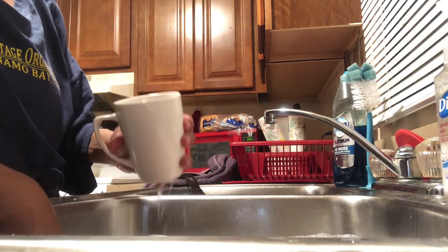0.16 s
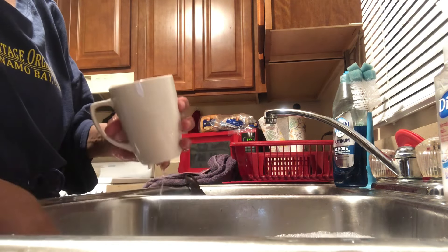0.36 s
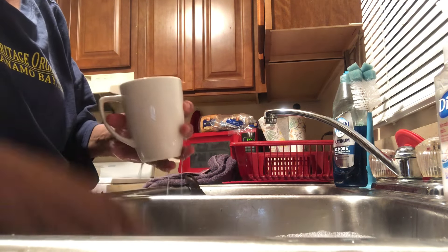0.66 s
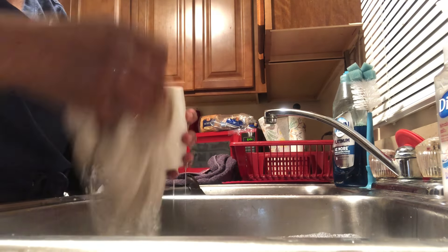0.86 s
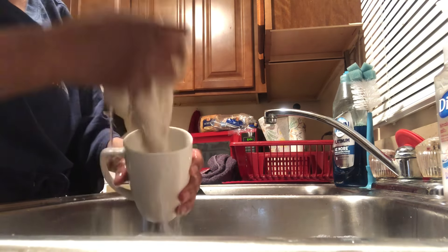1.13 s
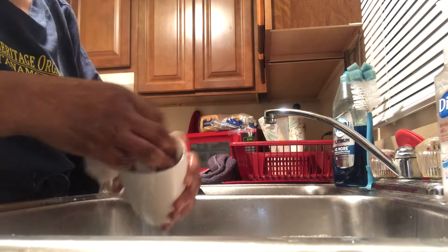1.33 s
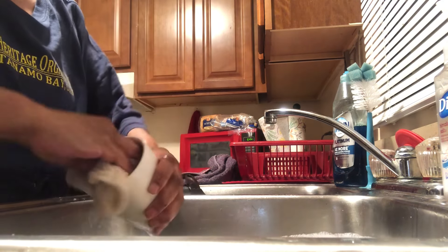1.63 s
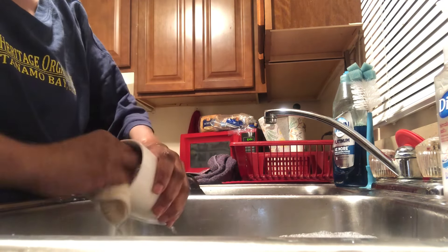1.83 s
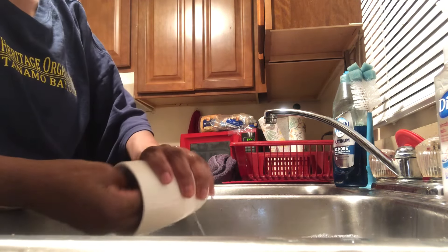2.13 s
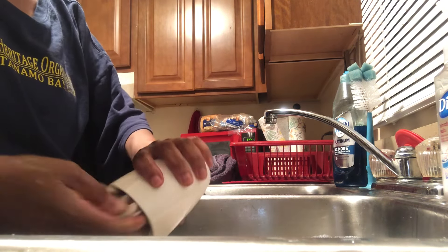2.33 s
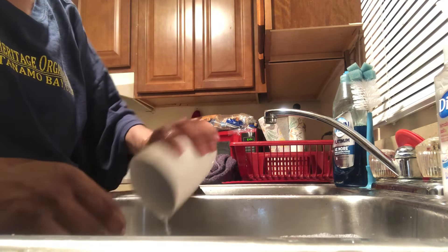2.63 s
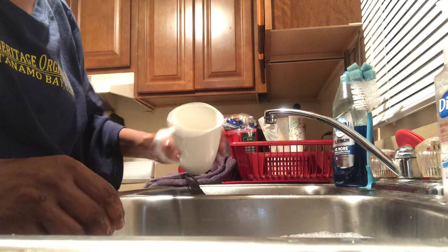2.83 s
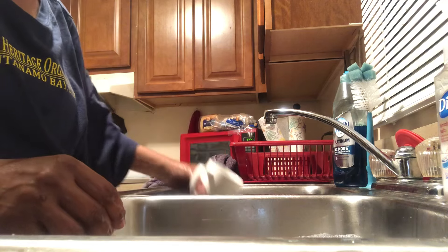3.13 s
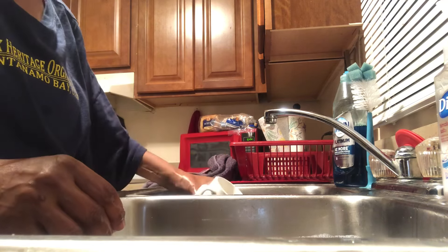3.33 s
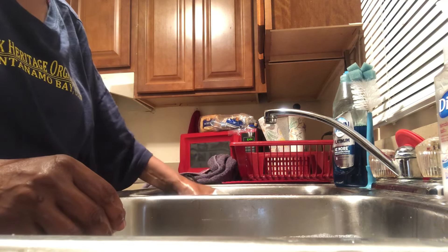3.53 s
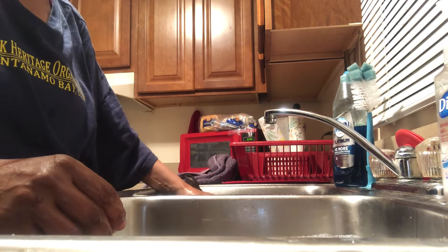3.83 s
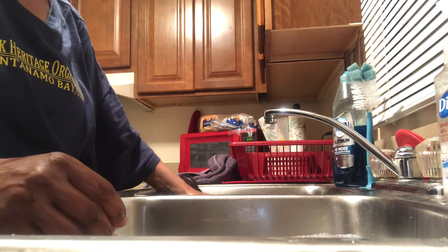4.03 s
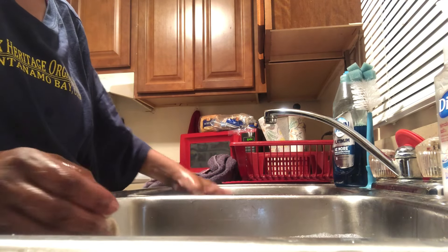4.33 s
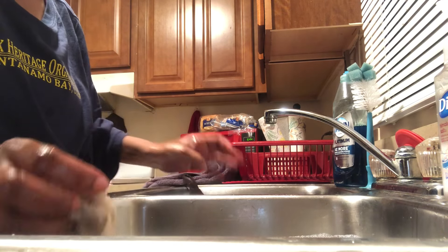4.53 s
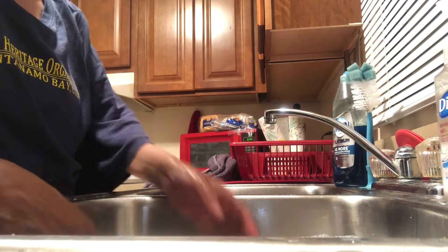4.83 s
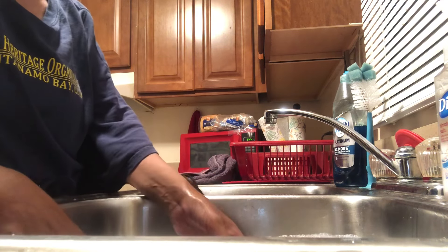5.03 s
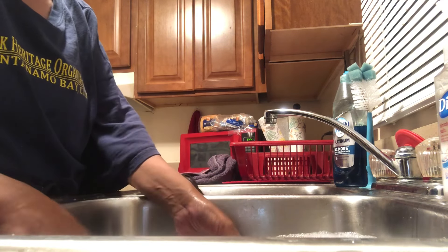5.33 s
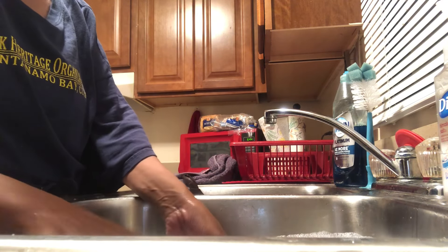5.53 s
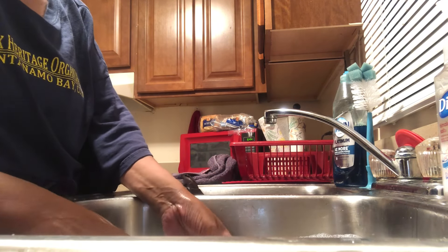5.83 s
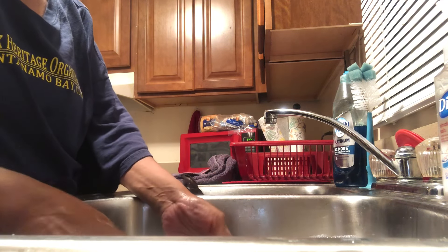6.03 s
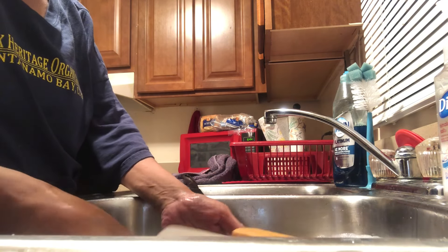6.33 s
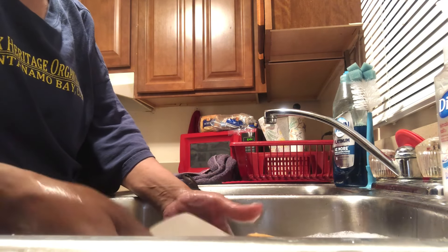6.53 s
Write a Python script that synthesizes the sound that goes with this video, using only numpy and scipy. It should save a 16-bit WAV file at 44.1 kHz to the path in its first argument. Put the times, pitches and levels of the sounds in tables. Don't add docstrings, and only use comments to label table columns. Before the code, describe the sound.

Bright bubbly drips open over very quiet room air, swelling into splashes and gurgles from a squeezed cloth. Smaller drops spill from a mug and fade. A ceramic mug clunks on ringing steel, slides and rocks briefly. Then wet hands swish, and a submerged dish knocks low and dull, dragging roughly along the sink floor. Close microphone, short kitchen echoes.

```python
import sys
import numpy as np
from scipy import signal
from scipy.fft import rfft, irfft
from scipy.io import wavfile
from scipy.ndimage import uniform_filter1d

SR = 44100
rng = np.random.default_rng(int(sys.argv[2]) if len(sys.argv) > 2 else 0)


def pcm_store(signal):
    levels = np.round(np.clip(np.atleast_2d(signal), -1, 1) * 32767)
    wavfile.write(sys.argv[1], SR, levels.astype(np.int16).T)


def invert_db(x):
    u = np.asarray(x, float) / 20
    return 10 ** u


N = 294577

# f/Hz, density/dB per Hz
ROOM_TONE = [(15, -61), (25, -42), (42, -19), (65, -2.5), (87, -10.5), (142, -6.5), (167, -15.5),
             (279, -15.5), (377, -22), (431, -15), (631, -22.5), (2580, -33), (16300, -46)]
ROOM_TONE_DB = -65
# t/s, level/dB
FLOW = [
    [(0, -59), (.55, -69), (.9, -57.5), (1.2, -44.5), (1.45, -62.5), (1.75, -69), (2.25, -56.5), (2.6, -72),
     (2.9, -86)],
    [(4.3, -73), (4.62, -73), (4.8, -72), (5.1, -75), (5.7, -78), (6.67, -65)],
]
# t_peak/s, gurgle level/dB, spray level/dB, 20 dB fall/s (negative: reversed in time)
SPLASHES = [(0.138, -53, -69, 1.3), (.344, -72, -78, -1.3), (.863, -54.5, -56.5, 1.8),
            (1.03, -35, -46, .07), (1.28, -36, -44, 0.0426), (1.532, -47, -58, 0.07),
            (1.619, -47, -73, 0.02), (1.85, -44.5, -63, 0.15), (2.125, -52.5, -71, 0.13),
            (2.4, -45.5, -66, 0.23), (2.443, -61, -50.5, 0.13), (2.669, -61.5, -64.5, 0.13),
            (4.763, -42, -49, 0.21), (4.917, -45.5, -49, 0.1236), (5.42, -54, -66, 0.06),
            (5.825, -53, -53, 0.06), (5.967, -47, -63, 0.35), (6.24, -50, -66, -0.1), (6.42, -49, -60, 0.3),
            (6.52, -46, -64, 0.1)]
# f/Hz, density/dB per Hz
GURGLE = [(180, -39), (300, -19.5), (361, -0.5), (422, -7), (1180, 0), (1340, 2), (6310, -17.5),
          (9000, -19), (11700, -33), (19800, -120)]
# f/Hz, density/dB per Hz
SPRAY = [(1470, -21), (2500, 7), (5480, 1.5), (6730, -0.5), (8450, -8), (14200, -14.5), (15700, -16),
         (16300, -33)]
# t/s, level/dB, f/Hz
MUG_AIR = [
    (2.06, -70, 336),
    (2.09, -53, 330),
    (2.14, -66, 328.3),
    (2.28, -62, 341),
    (2.35, -43, 366.4),
    (2.44, -74, 357),
]
# t/s, bubble peak level/dB, bubble f/Hz, slap level/dB
DROPS = [ (0.047, -36, 3080, -59), (0.071, -34, 710, -38.5), (0.116, -20, 986, -41),
         (0.134, -27.5, 2140, -38.5), (0.177, -35, 2180, -34.5),  (0.267, -42, 2300, -47),
         (0.322, -35, 2800, -64), (0.342, -32, 1130, -42), (0.395, -42, 1060, -42), (0.434, -40, 1280, -67),
         (0.488, -37, 573, -67), (0.512, -41.5, 6250, -68), (0.528, -38.5, 1650, -73),
         (0.601, -31.5, 2740, -45),  (0.619, -41, 3350, -60), (0.6765, -41, 2270, -60),
         (0.691, -36.5, 2060, -37), (0.712, -41, 1150, -60), (0.74, -40, 1230, -60),
         (0.756, -39, 1690, -34), (0.765, -49, 1210, -32), (0.799, -38, 1210, -55), (0.832, -41, 1150, -60),
         (0.853, -41.5, 3550, -37), (0.865, -39, 1950, -60), (0.889, -35, 2030, -36),
         (0.937, -37, 2620, -48), (0.949, -38, 2850, -46), (0.978, -43, 4540, -47),
         (1.009, -38, 3480, -31.5), (1.031, -34.5, 1110, -45), (1.051, -26, 1180, -47),
                (1.155, -47, 2070, -35), (1.158, -34, 1180, -45), (1.178, -33, 2250, -28),
               (1.21, -35, 1200, -47), (1.235, -38, 1750, -27), (1.258, -28, 985, -34.5),
               (1.273, -22.5, 1605, -37), (1.241, -34, 3200, -36), (1.326, -38, 3040, -55),
               (1.341, -35, 4500, -42), (1.358, -37, 4010, -36), (1.456, -31.5, 4540, -37),
               (1.468, -25, 1960, -30), (1.529, -23.5, 7100, -30), (1.53, -31, 1640, -60),
               (1.565, -37, 3500, -38),  (1.604, -28, 1105, -69), (1.699, -30.5, 1826, -35.5),
                (1.771, -45, 2080, -44), (1.831, -31.5, 1670, -32.5), (1.841, -37, 3000, -50),
               (1.878, -39, 1400, -60), (1.914, -36, 1550, -55), (1.942, -43, 1200, -60),
               (1.861, -38, 1600, -40), (1.899, -36, 1510, -34.5),
         (2.054, -35, 2710, -40), (2.134, -31.5, 2980, -56),  (2.109, -38, 2640, -55),
               (2.191, -37, 960, -54), (2.228, -36, 1780, -60), (2.294, -37, 1460, -60),
               (2.227, -27.5, 6150, -30.5), (2.248, -37, 6060, -44),  (2.308, -32, 1060, -35.5),
               (2.32, -31.5, 5870, -31), (2.342, -34, 3720, -42),  (2.379, -40, 1030, -34),
               (2.409, -30, 970, -47), (2.441, -38, 3500, -29), (2.467, -40, 1500, -36),
               (2.523, -36.5, 1650, -47), (2.555, -45.5, 4660, -59), (2.58, -38, 1910, -67),
               (2.65, -47, 4650, -42), (2.702, -44.5, 2480, -39),
         (4.687, -42.5, 1030, -74), (4.7634, -37, 780, -35.5), (4.7872, -29.5, 844, -40),
              (4.817, -35, 1080, -60), (4.841, -33, 1000, -72), (4.8796, -26, 2150, -55),
              (4.9046, -34, 5120, -36), (4.91, -34, 2540, -34), (4.9248, -37, 4370, -34.5),
              (5.029, -40.5, 3100, -55), (4.9604, -37, 4220, -65), (5.196, -48, 2800, -40),
              (5.237, -50, 8200, -50), (5.3445, -46, 2900, -39.5), (5.4028, -33.5, 1580, -62),
              (5.4186, -38.5, 880, -41), (5.569, -50, 2200, -42), (5.9425, -46, 1500, -34),
              (6.501, -36, 2900, -38), (5.9934, -43, 964, -44),  (6.2086, -35.5, 3330, -48),
              (6.2241, -35.5, 2830, -51),  (6.2848, -41, 1720, -44.5), (6.354, -36.5, 1810, -46.5),
              (6.4118, -41, 4900, -46), (6.4292, -35.5, 1620, -33.5)]
# t/s, peak level/dB, start f/Hz, end f/Hz, length/s
BLOOPS = [(0.764, -37.5, 1221, 1215, 0.018), (0.808, -46, 928, 1214, 0.054), (1.04, -44.5, 534, 609, 0.059),
          (1.2746, -18.5, 615, 610, 0.016), (1.289, -25, 600, 653, 0.014),  (1.631, -33, 1126, 1140, 0.009),
          (2.417, -43, 920, 920, 0.028), (4.747, -24, 846, 930, 0.0037), (4.8632, -24, 920, 1900, 0.013),
          (5.0576, -28, 720, 1000, 0.014), (5.072, -40, 1000, 1500, 0.035), (5.11, -50, 1550, 1620, .025),
          (6.2955, -34, 1730, 1670, 0.011), (6.3775, -31.5, 760, 770, 0.0063)]
# t/s, peak level/dB, start f/Hz, end f/Hz, length/s
HOLLOW_KNOCKS = [(3.6525, -15, 800, 760, .007), (3.668, -29, 900, 885, .075), (3.655, -32, 140, 135, .07),
                 (4.0045, -21, 720, 700, .005), (3.9, -37, 135, 130, .09), (4.04, -34, 140, 135, .07),
                 (4.046, -28, 780, 780, .008), (4.063, -27, 800, 760, .003), (5.444, -16, 236, 246, .03),
                 (5.485, -27, 240, 236, .05), (5.57, -30, 118, 118, .1), (5.789, -17, 520, 470, .012),
                 (5.808, -15, 480, 520, .018), (5.842, -18, 215, 205, .035), (5.86, -30, 95, 82, .16),
                 (6.505, -21, 520, 500, .03), (6.55, -23, 560, 480, .025), (6.578, -19, 300, 260, .012),
                 (6.56, -30, 90, 85, .08), (6.293, -37, 1100, 1050, .01), (4.93, -36, 85, 80, .05),
                 (1.024, -33, 1000, 1150, .008)]
# f/Hz, level/dB, t60/s
BASIN = [(90.3, -5.5, 0.086), (112.4, -18, 0.45), (163.6, -15, 0.57), (227, 0.5, 0.34), (255.8, -3.5, 0.25),
         (363, -11, 0.16), (428, -7.5, 0.1), (507.4, -7.5, 0.2), (574, -9.5, 0.089), (669, -14, 0.07),
         (763, -17.5, 0.54), (928, -15.5, 0.32), (1200, -22.5, 0.27), (1900, -27, 0.016),
         (2690, -38, 0.059), (4650, -55, 0.14), (7700, -63.5, 0.045), (14950, -78.5, 0.025)]
# t/s, blow level/dB, tilt/dB per octave above main mode, boom level/dB, touch damping/dB per s
KNOCKS = [(.073, -42, 2, -12, 60), (0.391, -47, 3, -7, 58), (.488, -55.5, 3.5, -16, 200),
          (4.928, -55.5, 8, 19.5, 104), (5.43, -32, 3, -15.5, 300), (5.437, -23, -3, -15, 67),
          (5.5685, -9.5, -6, -19, 220), (5.787, -14, 0.7, -16, 400), (5.806, -18, 1.5, -16, 300),
          (5.817, -19, -1.5, -15, 205), (5.847, -19.5, -1, -14, 249), (5.877, -25, 2, -2, 205),
          (5.943, -45.5, 11, 25, 208), (5.995, -35.5, 4, 19, 210), (6.221, -39, 2.5, 8, 200),
          (6.5015, -21, 4.5, -19, 298), (6.517, -23, 1.5, -10, 250), (6.552, -24, 3, 3, 300),
          (6.572, -20, -1.5, -5, 300), (6.634, -28, 1, -5, 298.5)]
# t_peak/s, level/dB, 20 dB rise/s, 20 dB fall/s, hardness/0-1
DRAG = [
    (5.209, -41.5, 0.12, 0.054, 1),
    (5.428, -38.5, 0.19, .012, 0.72),
    (5.799, -28, 0.01, 0.15, 0.1),
    (6.0, -35, 0.44, .17, 0.5),
    (6.517, -31, 0.04, 0.15, 0.9),
    (6.58, -26, 0.0869, .07, 0.45),
    (6.67, -33.5, 0.11, 0.092, 0.7),
]
# t_peak/s, level/dB, 20 dB rise/s, 20 dB fall/s, bright fizz/0-1
WIPES = [(5.2, -47, .06, .08, .8), (5.235, -49, .04, .05, .8), (5.35, -53, .004, .07, .6),
         (5.48, -57, .1, .25, .3), (5.58, -50, .01, .05, .2), (5.66, -61, .1, .3, .2),
         (6.51, -44, .02, .08, .35), (6.57, -44, .08, .1, .2), (3.94, -58, .1, .08, .9),
         (1.035, -41, .025, .07, .4), (1.26, -48, .06, .12, .9), (1.535, -48, .006, .06, .9)]
# f/Hz, density/dB per Hz
HISS = [(300, -6), (1000, 0), (4000, -6), (8000, -14), (15500, -20), (16500, -50)]
# f/Hz, level/dB, t60/s
MUG = [(95, -14, 0.2), (259.5, -8.5, 0.18), (352, -18, 0.2), (488, -14.5, 0.15), (590, -8, 0.09),
       (723, -1.5, 0.07), (790, -2.5, 0.07), (888, -5, 0.12), (1120, -9, .13), (1195, -8, 0.17),
       (1600, -13.5, 0.1), (1880, -16, 0.25), (2250, -15.5, 0.085), (3100, -13.5, 0.052),
       (3580, -18.5, 0.054), (4530, -27, 0.15), (5150, -24, 0.09), (6150, -29, 0.1), (7400, -33.5, 0.19),
       (11300, -44.5, 0.17), (15230, -49, .08)]
# t/s, blow level/dB, tilt/dB per octave above main mode, boom level/dB, touch damping/dB per s
SET_DOWN = [
    (3.651, -26, 0.5, -6, 450),
    (3.665, -30.5, 2, -9, 68.5),
    (3.897, -26.5, -14, -0.5, 401),
    (4.004, -31, -12, -10, 300),
    (4.0405, -35, 3.2, 3.5, 200),
    (4.062, -43, 3, -9.5, 98.5),
    (4.216, -41, -10, 1, 300),
    (4.228, -42, -6, -3, 250),
]
# t_peak/s, level/dB, 20 dB rise/s, 20 dB fall/s, hardness/0-1
SLIDE = [
    (3.9, -39, 0.1072, 0.21, 0.11),
    (3.94, -38.5, 0.09, 0.055, 0.55),
]
# f/Hz, level/dB, t60/s
CLINK = [(5082, -2, 0.13), (5800, -17, 0.42), (6630, -16, 0.29), (8500, -8.5, 0.18)]
CLINK_S = 5.817
# f/Hz, t60/s
KITCHEN = [(200, 0.53), (1000, 0.24), (4000, 0.24), (12000, 0.22)]


def evened(x):
    return x / np.sqrt(np.mean(x ** 2) + 1e-20)


def read(points, hz):
    f, value = np.transpose(points)
    return np.interp(np.log(hz + 1), np.log(f + 1), value)


def along(tables, column, rest):
    out, t = np.full(N, float(rest)), np.arange(N) / SR
    for rows in tables:
        rows = np.array(rows)
        inside = (t >= rows[0, 0]) & (t <= rows[-1, 0])
        out[inside] = np.interp(t[inside], rows[:, 0], rows[:, column])
    return out


def add(mix, s, sound):
    part = mix[round(s * SR):][:len(sound)]
    part += sound[:len(part)]


def colour(x, points):
    return irfft(rfft(x) * invert_db(read(points, np.fft.rfftfreq(len(x), 1 / SR))), len(x))


def swells(peak_s, level, rise_s, fall_s):
    late_s = np.arange(0, N, 32)[:, None] / SR - peak_s
    shape = level * invert_db(-20 * np.maximum(late_s / fall_s, -late_s / rise_s))
    return np.repeat(np.sqrt((shape ** 2).sum(1)), 32)[:N]


def room_tone():
    return invert_db(ROOM_TONE_DB) * evened(colour(rng.standard_normal(N), ROOM_TONE))


def bubble(hz, cycles, glide):
    u = np.arange(round(5 * cycles * SR / hz)) * hz / SR / cycles
    start = 1 - np.exp(-(u * cycles) ** 2)
    return np.sin(2 * np.pi * cycles * (u + glide * u ** 2)) * np.exp(-u) * start


def patter(spectrum, low_hz, high_hz, per_s, cycles, wash):
    pick, out = rng.random(N), np.zeros(N)
    size = invert_db(3.5 * np.minimum(rng.exponential(1, N), 4))
    pitches_hz = np.geomspace(low_hz, high_hz, num=20)
    for k, hz in enumerate(pitches_hz):
        train = size * (abs(pick * SR * len(pitches_hz) / per_s - k - 0.5) < 0.5)
        grain = bubble(hz, cycles * rng.uniform(0.46, 2.405), rng.uniform(0, 0.04))
        grain = grain / np.linalg.norm(grain) * np.sqrt(hz) * invert_db(read(spectrum, hz))
        out += signal.oaconvolve(train, grain)[:N]
    fine = evened(colour(rng.standard_normal(N), spectrum))
    return evened(evened(out) + wash * fine)


def spurts():
    bursts = invert_db(7.9 * rng.exponential(1, N)) * (rng.random(N) < 70 / SR)
    bursts = signal.lfilter([1], [1, -np.exp(-1 / (0.008 * SR))], bursts)
    return evened(1.5 + np.minimum(bursts, 5))


def trickle():
    peak_s, gurgle_db, spray_db, fall_s = np.transpose(SPLASHES)
    flow, rise_s = invert_db(along(FLOW, 1, -120)), 0.48 * fall_s
    gurgle_level = np.hypot(invert_db(-1) * flow, swells(peak_s, invert_db(gurgle_db), rise_s, fall_s))
    spray_level = np.hypot(flow, swells(peak_s, invert_db(spray_db), rise_s, fall_s))
    gurgle = invert_db(-2.5) * gurgle_level * patter(GURGLE, 599.6, 5030, per_s=380, cycles=6.1, wash=0.56)
    spray = invert_db(-1.5) * spray_level * patter(SPRAY, 3008, 13730, per_s=1500, cycles=7.0, wash=0.71)
    return spurts() * (gurgle + spray)


def patchy(x):
    bands = evened(uniform_filter1d(rng.standard_normal(len(x) // 2 + 1), size=30))
    return evened(irfft(rfft(x) * invert_db(4.5 * bands), len(x)))


def drops():
    bubbles, slaps, t = np.zeros(N), np.zeros(N), np.arange(600) / SR
    for s, db, hz, slap_db in DROPS:
        cycles = 4.07 * (hz / 2000) ** 0.58 * rng.uniform(0.85, 1.17)
        add(bubbles, s, invert_db(db + 3.0) * bubble(hz, cycles, 0.01))
        add(slaps, s, invert_db(slap_db - 1.5) * patchy(rng.standard_normal(600)) * np.exp(-t / 0.0037))
    highpass = signal.butter(1, 2500, "high", fs=SR, output="sos")
    return bubbles + signal.sosfilt(highpass, colour(slaps, SPRAY) * invert_db(1))


def cavities():
    out = np.zeros(N)
    for s, db, start_hz, end_hz, length_s in [*BLOOPS, *HOLLOW_KNOCKS]:
        u = np.arange(0, 1.3, 1 / (length_s * SR))
        turns = np.cumsum(start_hz + (end_hz - start_hz) * u) / SR
        fade = np.exp(-1.4 * u) * np.minimum(turns / 0.73, 1) * np.clip((1.3 - u) / 0.19, 0, 1)
        add(out, s, invert_db(db) * np.sin(2 * np.pi * turns) * fade)
    return out


def ring(modes, crowd_db, count):
    hz, db, t60_s = np.transpose(modes)
    crowd_hz = hz[4] + (hz[-1] - hz[4]) * rng.random(count) ** 1.8
    weak_db = read(list(zip(hz, db)), crowd_db * 0 + crowd_hz) + crowd_db + 2.5 * rng.standard_normal(count)
    weak_t60_s = read(list(zip(hz, t60_s)), crowd_hz) * rng.uniform(0.11, 0.76, count)
    hz, db, t60_s = np.append(hz, crowd_hz), np.append(db, weak_db), np.append(t60_s, weak_t60_s)
    t = np.arange(SR // 3, dtype=np.float32) / SR
    decay = float(np.log(1000)) / np.maximum(t60_s, 0.02)[:, None].astype(np.float32)
    sines = np.sin(2 * np.pi * hz[:, None].astype(np.float32) * t)
    return hz, invert_db(db)[:, None].astype(np.float32) * np.exp(-decay * t) * sines


def strikes(hz, rings, main_count, octave, boom_hz, blows, contact_s):
    out, t = np.zeros(N), np.arange(rings.shape[1]) / SR
    for s, blow_db, tilt_db, boom_db, damp_db_per_s in blows:
        u = np.arange(1024) / (max(contact_s, 0.0005) * SR)
        rattle = (1 - np.exp(-3.0 * u)) * np.exp(-u) * rng.standard_normal(1024)
        rattle[0] = 0.7 * np.linalg.norm(rattle)
        drive = np.interp(hz, np.fft.rfftfreq(8192, 1 / SR), abs(rfft(rattle, 8192)))
        even = 1 / (drive + 0.3 * np.linalg.norm(rattle))
        spot = invert_db(0.67 * rng.standard_normal(len(hz))) * rng.choice([-1, 1], len(hz))
        spot[:main_count:2] = abs(spot[:main_count:2])
        spot[1:main_count:2] = -abs(spot[1:main_count:2])
        lean = invert_db(np.where(hz > boom_hz, tilt_db * np.maximum(octave, 0), boom_db))
        answer = (spot * lean * even).astype(np.float32) @ rings * invert_db(-abs(damp_db_per_s) * t)
        add(out, s, invert_db(blow_db) * signal.fftconvolve(answer, rattle))
    return out


def rubbing(rings, octave, rubs, slips_per_s, hard_db, drumming):
    out, t = np.zeros(N), np.arange(rings.shape[1]) / SR
    slips = evened(rng.standard_normal(N) * (rng.random(N) < slips_per_s / SR))
    peak_s, db, rise_s, fall_s, hardness = np.transpose(rubs)
    soft = swells(peak_s, invert_db(db) * np.clip(1 - hardness, 0, 1), rise_s, fall_s)
    hard = swells(peak_s, invert_db(db) * np.clip(hardness, 0, 1), rise_s, fall_s)
    for push, tilt_db in ((soft * slips + drumming, -1.5), (hard * slips, hard_db)):
        signs = rng.choice([-1, 1], len(octave))
        answer = (signs * invert_db(tilt_db * octave)).astype(np.float32) @ rings
        answer = answer * invert_db(-420 * t)
        out += signal.fftconvolve(push, answer / np.linalg.norm(answer))[:N]
    return out


def body(modes, main_hz, boom_hz, blows, contact_s, rubs, slips_per_s, crowd_db, hard_db, drumming):
    hz, rings = ring(modes, crowd_db, count=600)
    octave = np.log2(hz / main_hz)
    struck = strikes(hz, rings, len(modes), octave, boom_hz, blows, contact_s)
    return struck + rubbing(rings, octave, rubs, slips_per_s, hard_db, drumming)


def near_basin(water):
    drumming = invert_db(3) * np.diff(abs(water), prepend=0)
    return body(BASIN, 204, 190, KNOCKS, 0.004, DRAG, 3000, crowd_db=-10.5, hard_db=3.5, drumming=drumming)


def wipes():
    peak_s, db, rise_s, fall_s, fizz = np.transpose(WIPES)
    hiss = evened(colour(rng.standard_normal(N), HISS))
    dull = signal.sosfiltfilt(signal.butter(2, 3200, fs=SR, output="sos"), hiss)
    level = swells(peak_s, invert_db(db), abs(rise_s), abs(fall_s))
    bright = swells(peak_s, invert_db(db) * np.clip(fizz, 0, 1), abs(rise_s), abs(fall_s))
    return level * dull + bright * (hiss - dull)


def mug_hum():
    turn = np.exp(2j * np.pi * np.cumsum(along([MUG_AIR], 2, 350)) / SR)
    noise = rng.standard_normal(N) + 1j * rng.standard_normal(N)
    slow = signal.lfilter([1], [1, -np.exp(-np.pi * 45 / SR)], noise) / 100
    slow = uniform_filter1d(slow.real, size=300) + 1j * uniform_filter1d(slow.imag, size=300)
    return invert_db(along([MUG_AIR], 1, -120)) * evened((turn * slow).real)


def far_mug():
    return body(MUG, 643, 420, SET_DOWN, 0.002, SLIDE, 1300, crowd_db=-7, hard_db=4.5, drumming=0)


def clink():
    out, t = np.zeros(N), np.arange(SR // 5) / SR
    for hz, db, t60_s in CLINK:
        add(out, CLINK_S, invert_db(db - 44.0 - 60 * t / min(t60_s, 0.3)) * np.sin(2 * np.pi * hz * t))
    return out


def kitchen(x):
    taps = np.zeros(SR // 2)
    at = np.arange(120, len(taps) - 20, 20)
    taps[at + rng.integers(0, 20, len(at))] = rng.choice([-1.0, 1.0], len(at))
    hz, t, z = signal.stft(taps, SR, nperseg=256)
    fade = invert_db(-60 * t / read(KITCHEN, hz)[:, None])
    tail = signal.istft(z * fade, SR, nperseg=256)[1]
    return signal.fftconvolve(x, tail / np.linalg.norm(tail))[:N]


def scene():
    air = room_tone()
    water = trickle() + drops() + cavities() + mug_hum()
    near = water + near_basin(water) + wipes() + clink()
    far = far_mug()
    heard = near + far + kitchen(invert_db(-11.5) * near + invert_db(-1.5) * far)
    heard = signal.sosfilt(signal.butter(6, 66, "high", fs=SR, output="sos"), heard)
    return (heard + air)[None]


def low_pass(x):
    return signal.sosfilt(signal.butter(12, 16390, fs=SR, output="sos"), x)


def record(dry):
    return low_pass(dry)


dry = scene()
out = record(dry)
pcm_store(out)
```